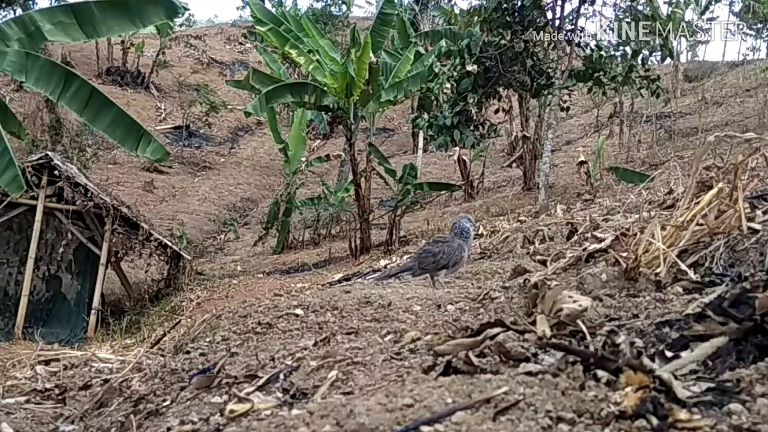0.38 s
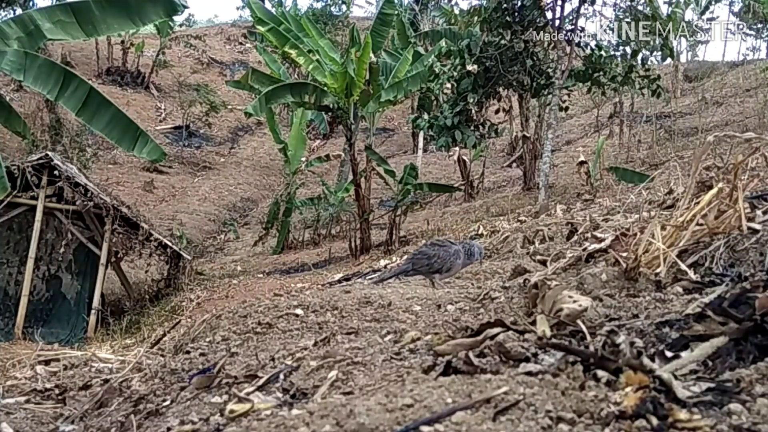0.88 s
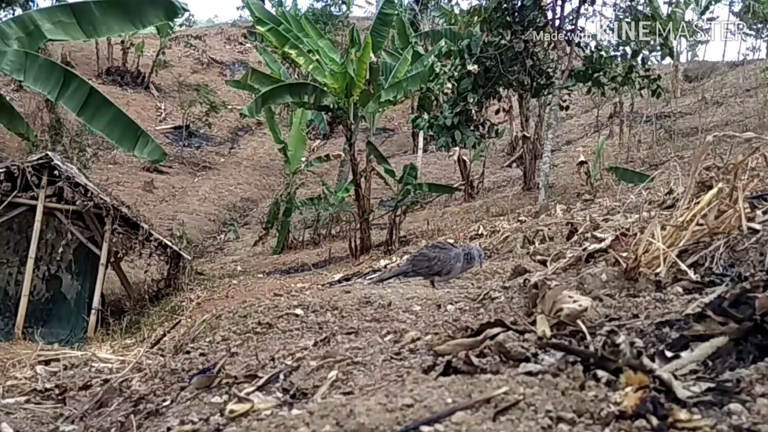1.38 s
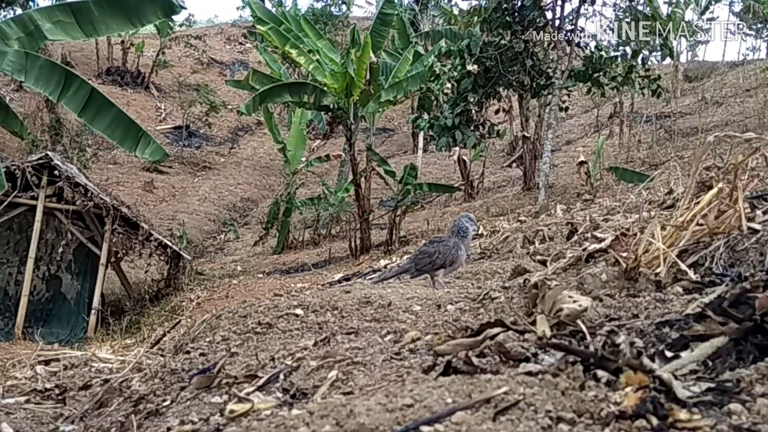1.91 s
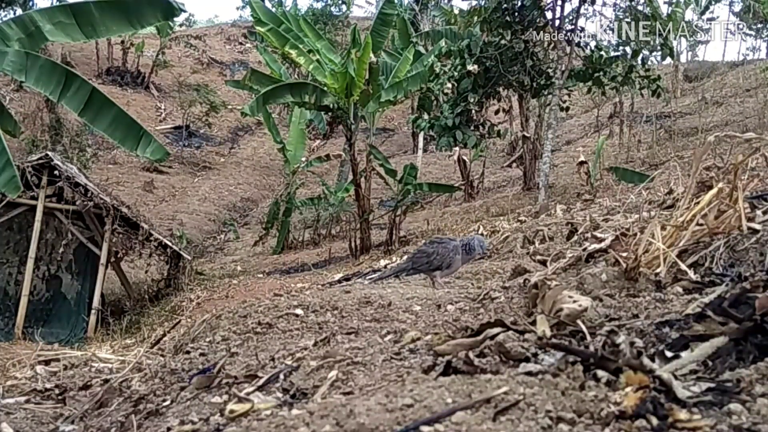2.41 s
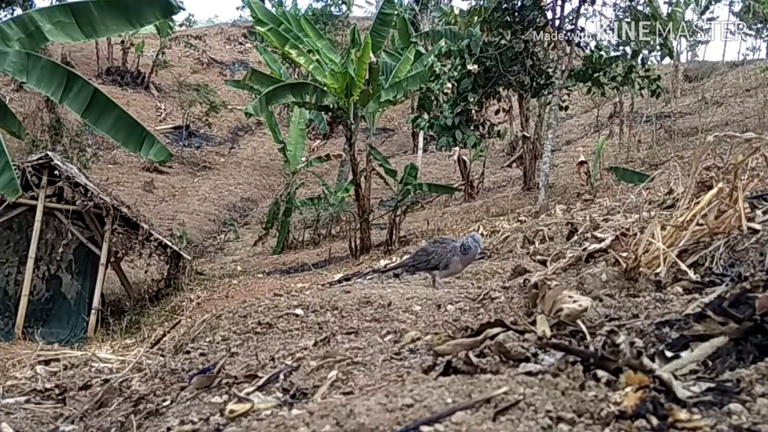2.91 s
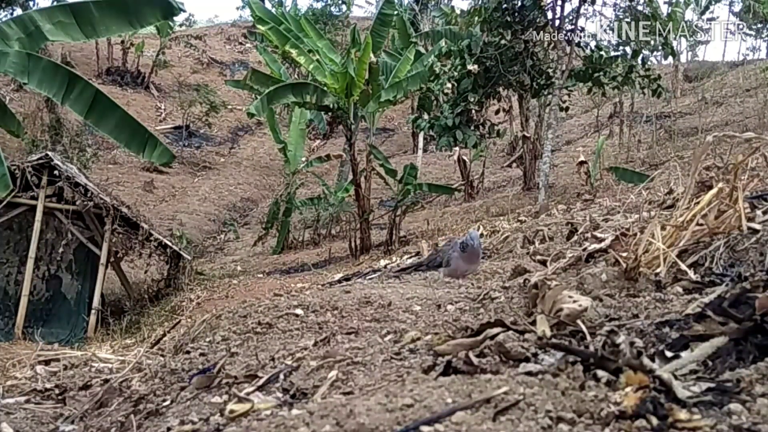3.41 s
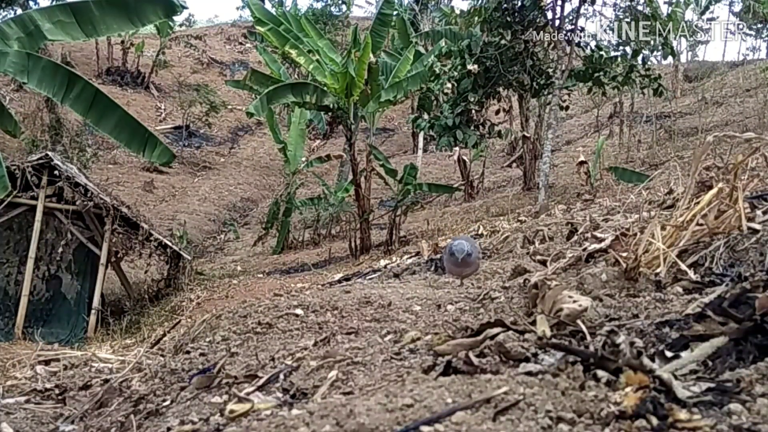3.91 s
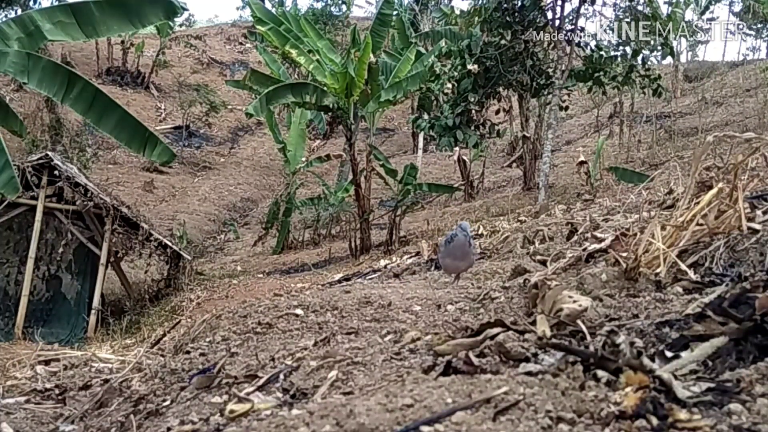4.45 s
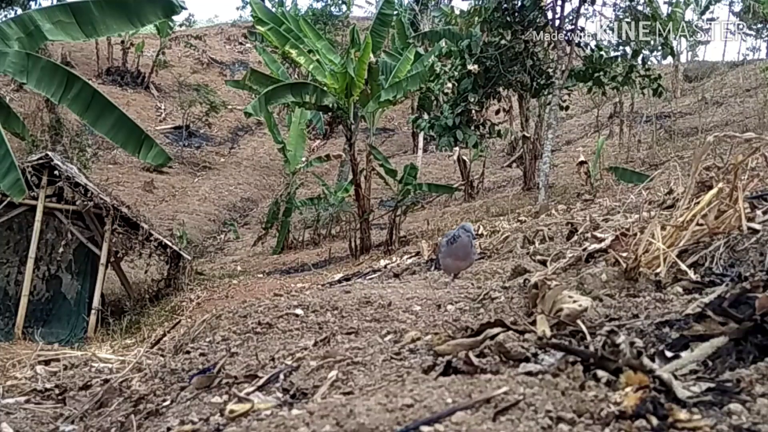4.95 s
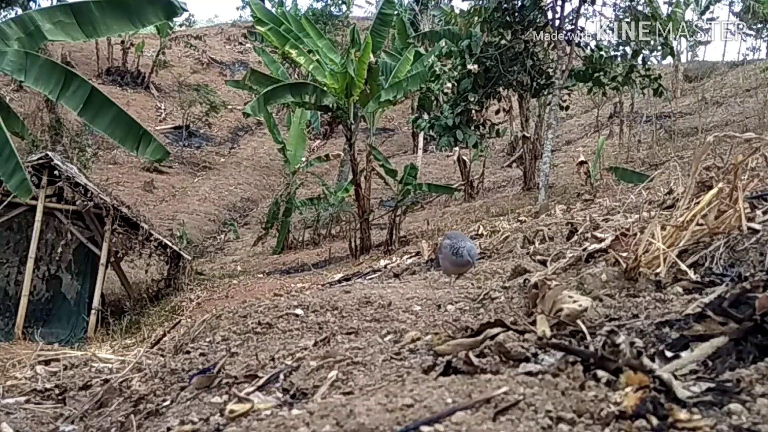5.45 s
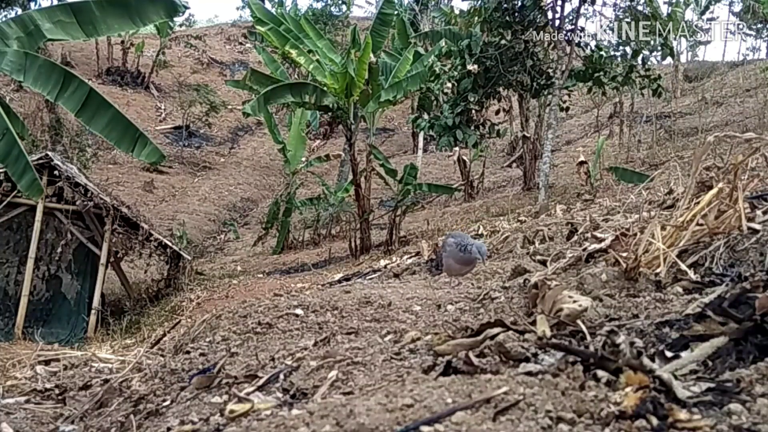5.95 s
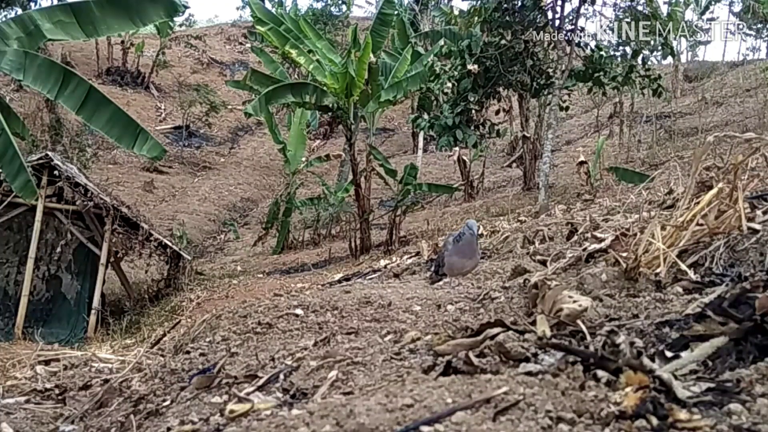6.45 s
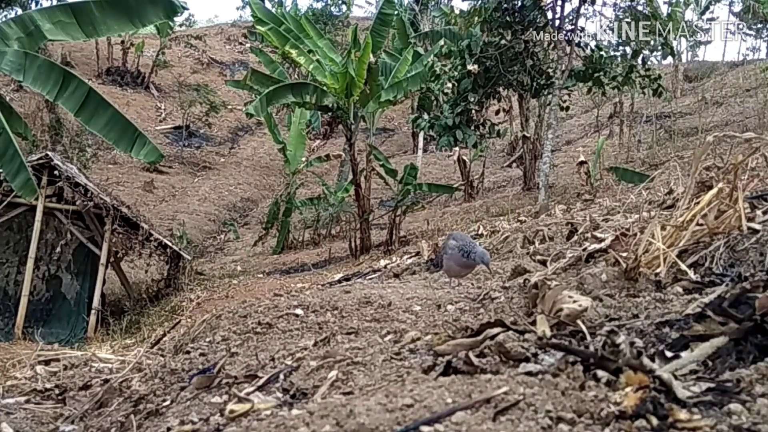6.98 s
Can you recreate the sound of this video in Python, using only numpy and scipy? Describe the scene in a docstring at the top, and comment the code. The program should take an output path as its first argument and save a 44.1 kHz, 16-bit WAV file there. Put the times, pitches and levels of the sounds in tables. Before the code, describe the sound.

Throaty, rolling dove coos overlap outdoors, starting close and strong and ending distant, over quiet air, low wind bumps and tiny high insect pings.

```python
"""A near dove is heard at once, in the middle of a trilled coo. Four doves on a dry hillside answer and overlap:
each coo is an almost pure tone that a throat valve breaks into a trill. Light wind rumbles on the microphone ports
as shaped noise, over quiet air. Insects hiss high up as a band of noise and ping as dying tones; a small bird
chirps far off in short gliding whistles. The slope sends back a faint echo of the doves and the bird."""
import sys
import numpy as np
from scipy import signal
from scipy.fft import rfft, irfft, next_fast_len
from scipy.io import wavfile
from scipy.ndimage import uniform_filter1d, map_coordinates

SR = 44100
rng = np.random.default_rng(int(sys.argv[2]) if len(sys.argv) > 2 else 0)


def materialize(psi):
    """Save the field psi as 16-bit PCM at rate SR to the path in sys.argv[1].

    A 1-D psi becomes a single channel; in a 2-D psi each row is a channel.
    """
    bounded = np.clip(np.atleast_2d(psi).T, -1, 1)
    quanta = np.round(bounded * 32767).astype(np.int16)
    wavfile.write(sys.argv[1], SR, quanta)


def natural_amplitude(level_db):
    """Convert a level in decibels to a linear amplitude factor, elementwise."""
    exponent = np.asarray(level_db, float) / 20
    return 10 ** exponent


N = 312669  # length of the scene [samples]


def unit(x):
    """Scale to rms 1."""
    return x / np.sqrt(np.mean(x ** 2) + 1e-20)


def along(points, hz):
    """Read a table of (frequency [Hz], value) on a log frequency axis."""
    f, v = np.transpose(points)
    return np.interp(np.log(hz + 1), np.log(f + 1), v)


def wobble(rate, n):
    """A smooth random curve of n samples, with rate random points a second."""
    points = rng.standard_normal(int(n * rate / SR) + 4)
    return map_coordinates(points, [np.arange(n) * rate / SR])


def filtered(x, response):
    """Multiply the spectrum of x by a response of frequency."""
    m = next_fast_len(N + 8192)
    return irfft(rfft(x, m) * response(np.fft.rfftfreq(m, 1 / SR)), m)[..., :N]


def add(track, s, sound):
    """Mix a sound in at s seconds."""
    part = track[round(s * SR):][:len(sound)]
    part += sound[:len(part)]


def rush(spectrum, alike):
    """Stereo noise of rms 1; alike is the left-right likeness."""
    mid, side = filtered(rng.standard_normal((2, N)), lambda hz: natural_amplitude(along(spectrum, hz)))
    turn = np.arccos(np.clip(alike, -1, 1)) / 2
    return unit(np.cos(turn) * mid + np.sin(turn) * side * np.array([[1], [-1]]))


def placed(x, left_lag_ms, left_over_right_db):
    """Both ports hear the source, slightly apart in time and level."""
    half = np.array([[.5], [-.5]])  # each port takes half the difference

    def port_response(hz):
        delay = np.exp(-2j * np.pi * hz * half * left_lag_ms / 1000)
        return natural_amplitude(left_over_right_db * half) * delay

    return filtered(x, port_response)


# How long the hillside echo takes to die by 60 dB: (frequency [Hz], time [s])
SLOPE_DECAY = [(350, 1.1), (600, 0.41), (1000, 1.1), (1500, 0.44), (4500, 0.26), (11000, 0.043)]


def slope(x):
    """The hillside answers late; each frequency dies at its own speed."""
    hz, t, noise = signal.stft(rng.standard_normal((2, SR)), SR, nperseg=256)
    decay = natural_amplitude(-60 * t / along(SLOPE_DECAY, hz)[:, None])
    tail = signal.istft(noise * decay, SR, nperseg=256)[1]
    tail = tail / np.linalg.norm(tail[0])
    late = np.pad(x, (700, 0))[None]  # 16 ms later
    echo = signal.fftconvolve(late, tail, axes=1)[:, :N]
    # moving air and leaves make the echo shimmer instead of holding a clean tone
    shimmer = unit(1.3 + np.array([wobble(70, N), wobble(70, N)]))
    return echo * shimmer


# Every coo of one kind has the same shape, stretched to its length.
# kind: (last trill rate over the first [ratio], pitch sweep of a full-depth beat before the dove's factor [Hz],
#        [(share of the length [0-1], pitch over the coo's own [ratio], level change [dB], trill depth [0-1])])
COO_SHAPES = { "hoot": (0.45, 71, [(0, .7, -12.5, 0), (.17, .93, -2, 0.14), (.3, 1, -1, .1),
              (.62, 0.98, -2.5, 0.1), (.8, .82, -2.5, .4), (1, 0.68, -17, .2)]),
              "cluck": (1.2, 44, [(0, 0.84, -13.5, .9), (.25, .95, -0.5, .9), (.55, 1.03, -3, 1),
              (.72, .82, -9, .4), (1, .7, -15, 0.6)]), "rise": (.7, 110, [(0, .69, -25, 0.9),
              (.14, .72, -14.5, 0.82), (.3, .8, -9.5, 0.8), (.45, .88, -1.5, .75), (.5, .98, -1.5, .05),
              (.72, 0.96, -1, .3), (.86, .94, -3, .02), (.93, .79, -4, .15), (1, .64, -25.5, 0.14)]),
              "roll": (0.64, 120, [(0, 0.8, -24, .6), (.11, 0.95, -4.5, 1), (.4, .93, -2, 1),
              (.78, 1, 0.5, .85), (.9, .93, -3.5, .6), (1, .68, -14.5, .4)]),
              "fall": (1.1, 215, [(0, .53, -20.5, .2), (.05, .84, -1, .6), (.09, 0.97, 1.5, .7),
              (.38, 0.97, 0, .92), (.55, 0.93, -1, .92), (.67, .87, -0.5, .9), (.76, .81, -4, .6),
              (.87, .72, -10.5, .4), (.96, .61, -20.5, 0.2), (1, .5, -28.5, 0.1)]),
              "slide": (1.7, 260, [(0, .66, -22, 0.3), (.07, 0.99, -1.5, 0.92), (.23, .995, 0, 0.97),
              (.46, .92, -0.5, 1), (.53, .85, -3.5, .55), (.68, .815, -7, .4), (.8, .77, -11, .45),
              (.88, .72, -14, 0.3), (.955, .645, -17, .1), (1, .5, -35, 0.02)]),
              "whirr": (1.7, 240, [(0, .9, -19, .75), (.04, 0.98, 1, .85), (.1, 1, -0.5, .85),
              (.35, 0.97, -3.5, .8), (.8, .93, -3, .9), (1, .87, -16.5, .9)]),
              "swell": (.3, 230, [(0, .7, -21.5, .7), (.075, .805, -10.5, .77), (.33, .88, -6.5, 0.94),
              (.5, .95, -2.5, 0.9), (.64, 0.97, -0.5, 0.7), (.7, .97, -.5, 0.46), (.76, .89, -4.5, 0.3),
              (.84, .835, -9.5, .12), (.93, .805, -11.5, .12), (.965, .68, -16.5, 0.05),
              (1, .55, -28.5, .1)]), "purr": (1.3, 200, [(0, .8, -6, .85), (.05, .99, -0.5, .9),
              (.35, .99, -1.5, .85), (.64, .95, -3.5, .75), (.8, .86, -3.5, .2), (.9, .78, -0.5, .05),
              (.96, .66, -6.5, 0.06), (1, .56, -18, 0.01)]), "lead": (1, 96, [(0, .8, -21.5, .9),
              (.42, .85, -6, .92), (.9, .995, 0.5, .92), (1, 1.1, -8.5, .7)]),
              "murmur": (.6, 35, [(0, 0.88, -8, .65), (.3, 1, 1, 0.58), (.7, 1, -1, 0.2),
              (1, 0.86, -10, 0.74)]), }
# The near dove holds its valve open and the trill clears to a plain tone: (start [s], length [s])
VALVE_HELD_OPEN = [(-.05, 0.095), (0.151, .078), (.247, .07), (1.24, .046), (1.326, 0.018), (1.392, .051),
                   (1.492, .053), (1.561, .035), (1.621, .03)]


def coo(dove, kind, start, length, top_hz, level_db, first_rate, sweep_factor):
    """A tone from the syrinx; in a trill the valve shuts once a beat and the pitch climbs as it opens again."""
    rate_ratio, sweep_hz, shape = COO_SHAPES[kind]
    share, *columns = np.transpose(shape)
    t = np.arange(max(start, 0), start + length, 1 / SR)
    n = len(t)
    u = (t - start) / length  # share of the coo gone by
    bend, change_db, depth = (np.interp(u, share, column) for column in columns)

    # plain moments: hardly any trill left, and 1 dB weaker
    held_open = sum((t > s) & (t < s + hold) for s, hold in VALVE_HELD_OPEN) * (dove == "near")
    depth = np.where(held_open, 0.027, depth)
    db = level_db + change_db - held_open
    hz, db, depth = (uniform_filter1d(c, size=220) for c in (top_hz * bend, db, depth))  # 5 ms blend
    depth = np.clip(depth, 0, 1)

    rate = first_rate * (1 + (rate_ratio - 1) * u ** 1.6) * (1 + .06 * wobble(45, n))
    beats = np.cumsum(rate / SR)
    # in a deep slow trill the valve stays open for a short burst only, then rests
    open_share = 1 - depth ** 2 * np.clip(1 - .012 * rate, 0, 1)
    burst = np.clip(beats % 1 / open_share, 0, 1)
    opening = np.abs(np.sin(np.pi * burst ** 1.185)) ** (0.53 + 0.47 * depth)

    # every beat starts afresh: its own phase, pitch and strength
    slip, detune, force = rng.standard_normal((200, 3))[beats.astype(int)].T
    climb = uniform_filter1d(1.2 * burst ** 0.65 - .95 + 0.1 * detune, size=110)
    pitch = hz * (1 + 0.0049 * wobble(90, n)) + depth * sweep_hz * sweep_factor * climb
    phase = 2 * np.pi * np.cumsum(pitch / SR)
    phase = phase + uniform_filter1d(1.1 * depth ** 2 * slip, size=220)
    scatter_db = .5 * wobble(70, n) + uniform_filter1d(.7 * depth * force, size=90)
    strength = natural_amplitude(db + scatter_db) * (1 + depth * (1.065 * opening - 1))
    edges = np.clip(np.minimum(u, 1 - u) * length / 0.0023, 0, 1)  # 2.3 ms fades

    # nearer, louder coos carry more overtones; the octave shows as the tone sags
    octave_db = 3.1 * (level_db + 31) - 25.5 - 79 * np.maximum(bend - 0.8, 0)
    third_db = 1.5 * (db + 31.5) - 29.0
    tone = np.sin(phase) + natural_amplitude(octave_db) * np.sin(2 * phase) + natural_amplitude(third_db) * np.sin(3 * phase)
    airflow = natural_amplitude(-26.5) * rng.standard_normal(n)
    return np.sqrt(2) * strength * edges * (tone + airflow)


# The doves. name: (echo level [dB], throat pitch [factor], trill sweep [factor])
FLOCK = {"near": (-26, 0.92, 1.01), "second": (-19.5, 1.02, 1.05), "far": (-16, 1.043, 1.1),
         "farthest": (-14, 1.1, 0.64)}
# Where each dove sits. name: (left lag behind right [ms], left level over right [dB])
PERCHES = {"near": (.035, -1.2), "second": (-.34, -.5), "far": (.095, -1.2), "farthest": (.095, -.8)}
# Swollen crop, before each dove's pitch factor: (frequency [Hz], gain [dB])
THROAT = [(180, -35), (270, -26), (350, -6), (450, 3.5), (620, 5.5), (800, -2), (900, -10), (1000, -16),
          (1150, -19), (1350, -39), (2500, -42)]
# The dry slope returns the upper tones best: (frequency [Hz], gain [dB])
SLOPE_TONE = [(300, -1), (600, -1.5), (900, 7.5), (1150, 8), (1400, -0.5)]
# Every coo: (dove, kind, start [s], length [s], pitch before bends [Hz], level before the throat [dB],
#             first trill rate [beats/s])
COOS = [("near", "fall", -.11, .462, 725, -28, 70), ("near", "roll", .918, .217, 635, -30, 92),
        ("near", "fall", 1.238, 0.46, 726, -29, 64), ("second", "hoot", 2.198, .097, 545, -49.5, 38),
        ("second", "rise", 2.44, .22, 763, -35, 56), ("second", "slide", 2.82, .56, 796, -35.5, 51),
        ("second", "roll", 3.72, .175, 640, -41, 90), ("second", "swell", 4.02, .6, 738, -35.5, 68),
        ("second", "lead", 4.975, 0.089, 670, -47.5, 49), ("second", "roll", 5.02, .185, 645, -40.5, 79),
        ("second", "swell", 5.33, .57, 722, -36, 72), ("far", "purr", -.15, .63, 775, -48.5, 48),
        ("far", "murmur", .53, 0.09, 540, -69, 51), ("far", "murmur", .815, .14, 665, -70, 36),
        ("far", "hoot", 1.765, .1, 698, -52.5, 60), ("far", "lead", 1.88, 0.11, 650, -50.5, 73),
        ("far", "rise", 1.93, .198, 732, -50, 52), ("far", "purr", 2.29, 0.69, 780, -50, 43),
        ("far", "cluck", 3.27, 0.12, 815, -47.5, 80), ("far", "rise", 3.43, .18, 765, -47, 88),
        ("far", "whirr", 3.78, .64, 815, -45, 52), ("far", "hoot", 4.78, .098, 697, -52, 57),
        ("far", "murmur", 5.04, 0.19, 725, -50.5, 98), ("far", "murmur", 5.22, .13, 665, -59, 46),
        ("far", "purr", 5.34, .65, 778, -49, 50), ("farthest", "cluck", 6.1, 0.073, 785, -49, 58),
        ("farthest", "rise", 6.25, .2, 760, -48.5, 77), ("farthest", "whirr", 6.592, 0.47, 830, -49.5, 59),
        ("farthest", "roll", 6.595, 0.48, 692, -52, 70)]


def doves():
    """Each dove sings through its swollen throat, from its own place on the slope."""
    out = 0
    for dove, (echo_db, tuning, sweep_factor) in FLOCK.items():
        voice = np.zeros(N)
        for row in COOS:
            if row[0] == dove:
                add(voice, max(row[2], 0), coo(*row, sweep_factor))
        voice = filtered(voice, lambda hz: natural_amplitude(along(THROAT, hz / tuning)))
        returned = filtered(voice, lambda hz: natural_amplitude(along(SLOPE_TONE, hz)))
        out = out + placed(voice, *PERCHES[dove]) + natural_amplitude(echo_db) * slope(returned)
    return out


# Tone of the wind rumble: (frequency [Hz], relative level [dB per Hz])
RUMBLE = [(12, -19.5), (22, 6), (95, 1.5), (135, -10), (170, -18.5), (240, -27.5), (320, -50.5),
          (500, -120)]
# Gusts on the ports: (start [s], hold [s], buffet level before the port gains [dB])
GUSTS = [(.15, 0.24, -61.5), (0.699, 0.025, -66), (.95, .02, -67.5), (1.23, .02, -65.5), (1.5, .3, -76),
         (1.953, 0.59, -79), (2.57, 0.042, -69), (2.897, .04, -77.5), (4.4, 0.026, -71),
         (4.59, 0.082, -62.5), (4.949, 0.2, -73), (5.222, 0.086, -69.5), (6.299, .15, -84)]


def wind():
    """Gusts hit fast, hold and die slowly; buffeting differs from port to port and is stronger on the left."""
    calm_db, rise_db_per_s, fall_db_per_s = -82.5, 351, 70.5  # calm level is before the port gains
    t = np.arange(N) / SR
    power = natural_amplitude(calm_db) ** 2
    for s, hold, db in GUSTS:
        top = s + 0.019
        rise_db = rise_db_per_s * np.maximum(top - t, 0)
        fall_db = fall_db_per_s * np.maximum(t - top - hold, 0)
        power = power + natural_amplitude(db - rise_db - fall_db) ** 2
    lumps = natural_amplitude(3.5 * np.array([wobble(7, N), wobble(7, N)]))
    buffeting = unit(lumps * rush(RUMBLE, .25))
    port_gain = natural_amplitude(np.array([[4.5], [.4]]))  # left, right
    return np.sqrt(power) * port_gain * buffeting


# Tone of the quiet air: (frequency [Hz], relative level [dB per Hz])
AIR = [(150, -120), (230, -2), (400, 2), (1000, -4), (1500, -8), (4000, -10.5), (7500, -13), (12000, -11.5),
       (15300, -11), (15500, -120)]


def quiet_air():
    """The air of the field is a steady, soft, wide noise."""
    return natural_amplitude(-88.5) * rush(AIR, .05)


# Tone of the insect chorus: (frequency [Hz], relative level [dB per Hz])
CHORUS = [(7800, -120), (8300, -11.5), (9000, 0.5), (10000, 1.5), (11000, 0.5), (11500, -13.5),
          (12000, -120)]
# Single insect pings: (time [s], pitch [Hz], level before the port offset [dB], time to die by 60 dB [s])
PINGS = [(.2, 10890, -80, 0.19), (.53, 12600, -88, 0.65), (1.48, 11500, -79, .6),
         (1.52, 11500, -68.5, 0.26), (1.832, 11080, -83, 0.69), (2.13, 11620, -76, 0.6),
         (2.14, 11130, -71, 0.54), (2.17, 10670, -73.5, 0.35), (2.17, 9730, -84.5, .3),
         (2.47, 11060, -73.5, 0.43), (2.47, 12500, -95, .4), (3.098, 9770, -80.5, 0.29),
         (3.45, 11460, -93, 0.35), (4.99, 13940, -93.5, 0.039), (5.32, 11900, -79, .4),
         (5.33, 11150, -83, 0.44), (5.33, 10250, -78, 0.2), (5.38, 10600, -82, 0.63),
         (5.45, 9100, -76, 0.74), (5.63, 12040, -83, .4), (5.649, 11400, -77.5, .7),
         (5.67, 11500, -79.5, 0.37), (5.96, 10560, -83.5, 1), (6.93, 10240, -87, 0.45)]


def insects():
    """A far chorus hisses in one high band; pings flutter as they die away, differently on each port."""
    pings = np.zeros((2, N))
    t = np.arange(SR // 2) / SR
    for s, hz, db, t60 in PINGS:
        for port, side_db in zip(pings, (-1, 5)):
            flutter_db = 4 * wobble(60, len(t))
            drift = 1.6 * wobble(30, len(t))  # wandering phase
            fade = natural_amplitude(db + side_db + flutter_db - 60 * t / t60)
            onset = 1 - np.exp(-t / 0.0039)
            add(port, s, fade * onset * np.sin(2 * np.pi * hz * t + drift))
    swell = natural_amplitude(-89 + 1.3 * wobble(3.1, N) + 0.88 * wobble(5.9, N))
    chorus = swell * rush(CHORUS, .08) * natural_amplitude([[-.9], [.9]])
    return pings + chorus


# Far bird's whistles: (time [s], pitch the glide starts from before its hook [Hz], end pitch [Hz], length [s],
#                       level before flicker [dB])
CHIRPS = [(3.936, 3820, 3810, .06, -98.5), (4.048, 4520, 4177, 0.12, -75.5),
          (5.101, 4445, 4050, 0.11, -77.5), (5.15, 2896, 2750, .1, -95.5), (5.311, 3035, 2954, 0.11, -89.5),
          (5.502, 2490, 2376, 0.064, -96.5), (5.758, 4520, 4160, 0.1, -93), (2.142, 4440, 4370, .1, -101),
          (4.048, 5980, 5860, 0.067, -96), (6.763, 4480, 3970, 0.15, -87)]


def small_bird():
    """Short whistles that hook up and then fall, smeared by the distance."""
    song = np.zeros(N)
    for s, start_hz, end_hz, length, db in CHIRPS:
        u = np.arange(0, 1, 1 / (length * SR))
        glide = u + 0.35 * np.exp(-u / 0.03)  # the second part is the hook
        phase = 2 * np.pi * np.cumsum(start_hz + (end_hz - start_hz) * glide) / SR
        flicker_db = 6.9 * wobble(40, len(u))
        swell = np.sin(np.pi * u ** 0.51) ** 0.26
        add(song, s, natural_amplitude(db + flicker_db) * swell * np.sin(phase))
    return placed(song, -0.0076, -1.4) + natural_amplitude(-2.5) * slope(song)


def scene():
    """Doves, wind, the quiet air of the field, insects and a small bird."""
    return doves() + wind() + quiet_air() + insects() + small_bird()


def low_pass(x):
    """Removes everything above the highest recorded frequency."""
    return signal.sosfilt(signal.butter(12, 15430, fs=SR, output="sos"), x)


def record(dry):
    """A small camera takes in the finished mix."""
    return low_pass(dry)


dry = scene()
out = record(dry)
materialize(out)
```